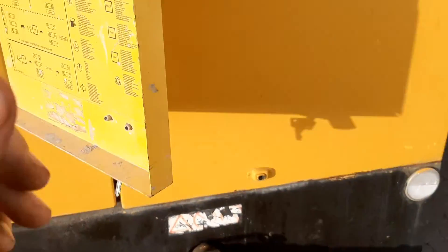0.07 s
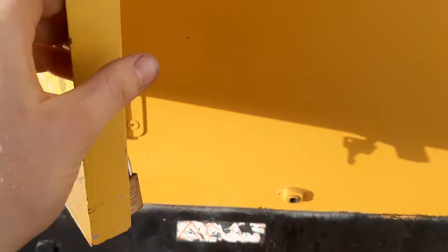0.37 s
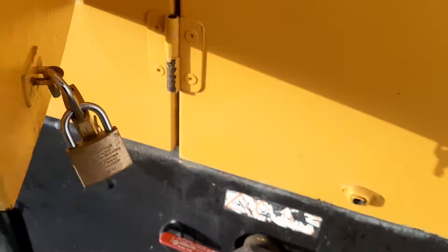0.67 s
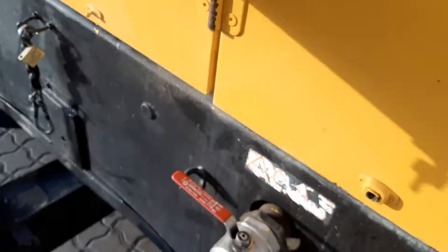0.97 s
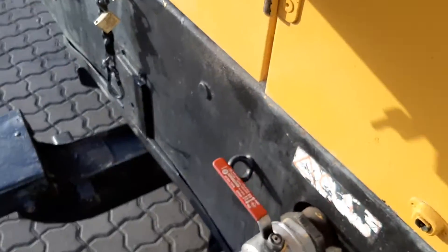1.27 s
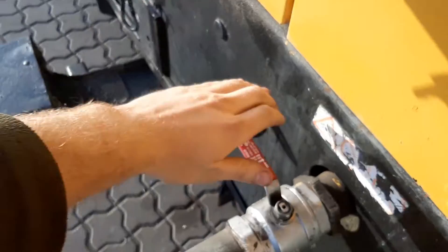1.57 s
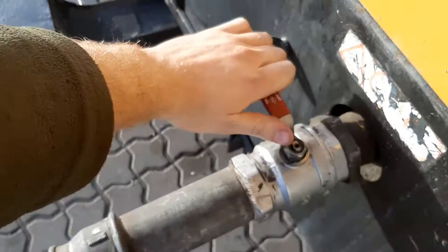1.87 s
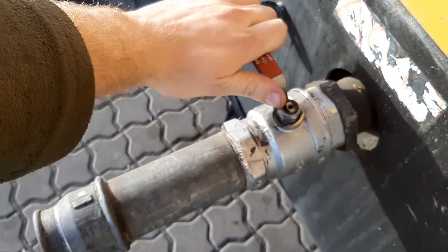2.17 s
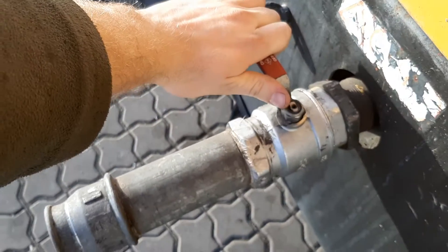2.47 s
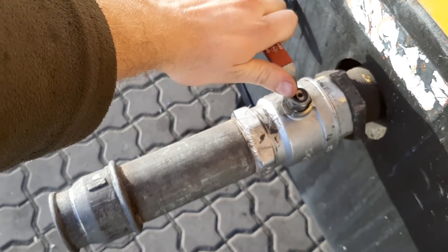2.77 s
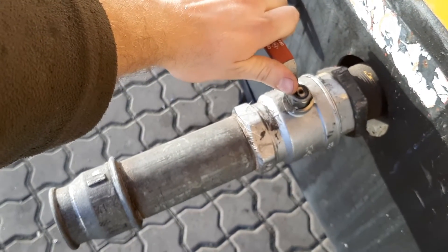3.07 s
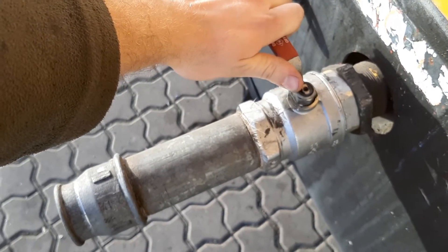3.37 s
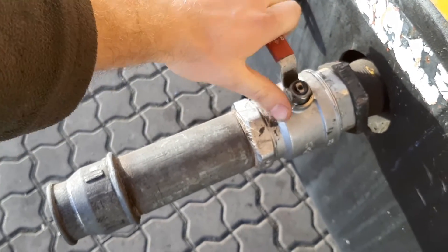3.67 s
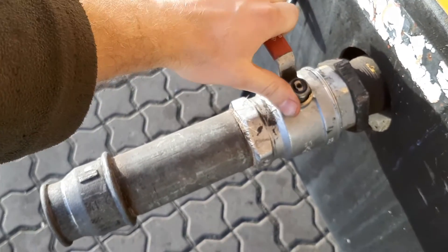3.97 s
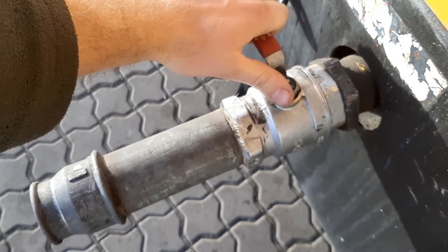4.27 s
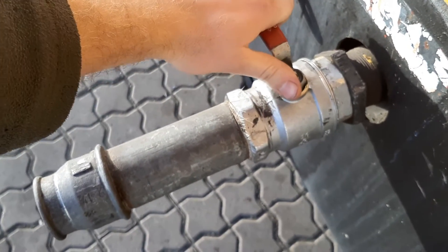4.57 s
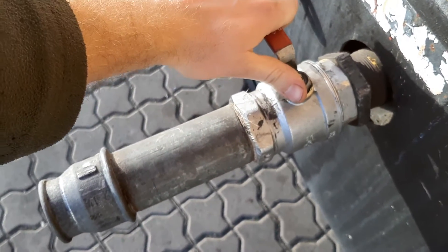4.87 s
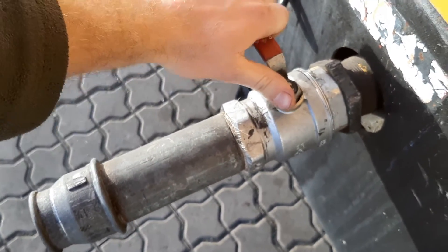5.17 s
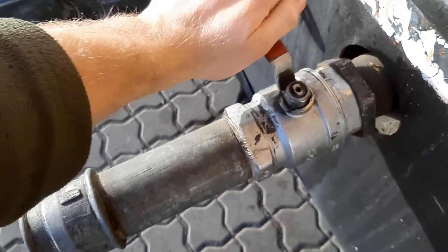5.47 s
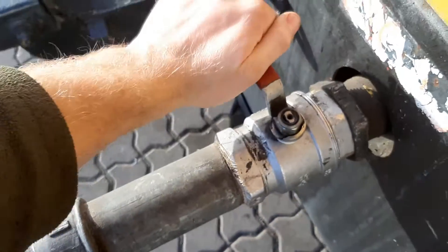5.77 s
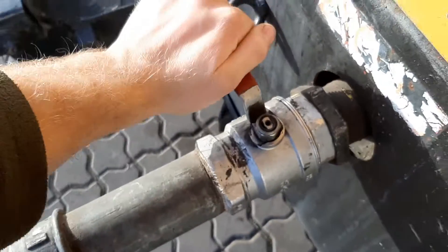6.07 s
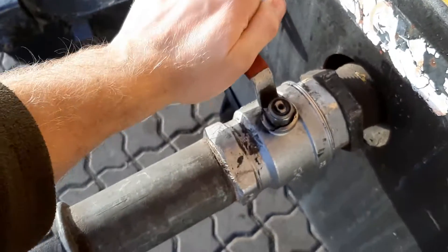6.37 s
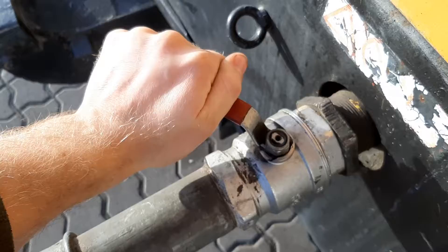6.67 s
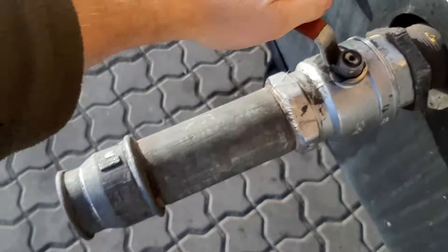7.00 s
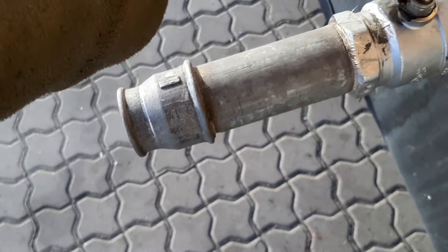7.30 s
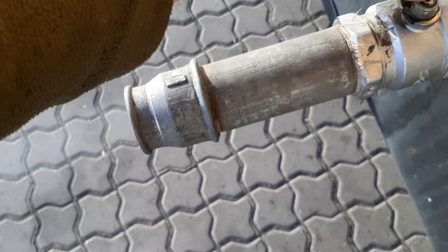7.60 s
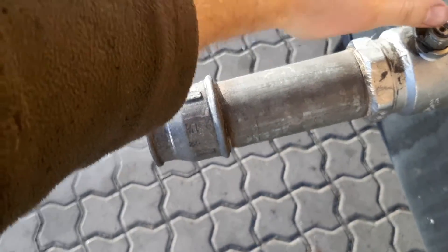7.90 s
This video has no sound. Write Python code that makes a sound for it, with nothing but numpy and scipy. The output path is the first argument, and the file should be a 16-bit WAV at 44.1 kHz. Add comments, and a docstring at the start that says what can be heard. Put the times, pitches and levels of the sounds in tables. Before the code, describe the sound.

Heard at arm's length in an open yard, a compressor's diesel engine hums and clatters evenly. Early on, a short ringing hiss comes with a padlock rattling against a metal hatch. The machine drones on alone until, near the end, air suddenly spits and blasts out of a pipe. This loud, broad hiss covers the drone and takes on a slightly whistling, hollow colour as the microphone draws back.

```python
"""On a paved yard, a towed diesel screw compressor drones at arm's length: periodic firing, rotor
discharge and fan give tones, while combustion knock and cooling air excite the sheet-metal canopy.
A hatch swings with a hollow tone and a brief hiss, and its padlock rings in its normal modes.
Later a ball valve is turned and a turbulent jet roars from an open pipe, comb-filtered by a close echo.
An automatic gain control ducks the drone under the jet."""
import sys
import numpy as np
from scipy import signal
from scipy.fft import rfft, irfft, next_fast_len
from scipy.io import wavfile

SR = 44100
rng = np.random.default_rng(int(sys.argv[2]) if len(sys.argv) > 2 else 0)


def to_wav(sig):
    """Store sig (one row per channel, or 1-D mono) as 16-bit WAV at the path in sys.argv[1].

    Samples outside -1..1 are clipped; the rate is SR.
    """
    pcm = np.clip(np.atleast_2d(sig), -1, 1) * 32767
    pcm = np.round(pcm).astype(np.int16)
    wavfile.write(sys.argv[1], SR, pcm.T)  # frames by channels


N = 358974
TIME, BINS = np.arange(N) / SR, np.fft.rfftfreq(next_fast_len(N, True), 1 / SR)
FIRING_HZ, LOBE_HZ = 48.45, 111.3   # rates of cylinder firing and rotor lobe discharge
# the listener's movements: start t/s, duration/s
STEP_DOWN = 0.55, 1.55   # from the hatch to the outlet
RETREAT = 6.6, 0.79   # back along the pipe


def compressor(speed_wander=0.001, split_hz=970, left_lag_ms=0.114):
    """Superposition of tones and noise timed by one governed shaft; deeper and duller at the outlet."""
    shaft_time = np.cumsum(1 + speed_wander * drift(2.5)) / SR
    at_outlet = move(*STEP_DOWN)
    drone_db, treble_db = between(-0.3, 0.1, at_outlet), between(2.5, 0.5, at_outlet)
    noise = clatter(shaft_time)
    low = below(noise, split_hz)
    boom = at_outlet * canopy_boom()
    deep = from_db(drone_db) * (drone(shaft_time) + low + boom) + hatch_cavity()
    bright = from_db(treble_db + 0.54 * drift(15)) * (noise - low)
    sizzle = 0.53 * (1 - at_outlet) * (noise - below(noise, 8400))
    left, right = deep + bright + sizzle + at_outlet * panels()
    return np.array([delayed(left, left_lag_ms), right])   # the machine stands to the right


# upper exhaust orders: f/FIRING_HZ, relative level/dB
EXHAUST_ORDERS = [(1.5, -41), (1.75, -47), (2.5, -39.5), (2.75, -37), (3, -31), (3.5, -43), (4, -36),
                  (4.5, -38.5), (5, -31.5), (6, -34.5), (7, -35.5), (9, -39.5), (13, -40), (15, -42.5),
                  (17, -51), (18, -45), (18.5, -43.5), (20, -62), (21, -43.5), (22, -46.5), (32, -45)]
# screw harmonics: f/LOBE_HZ, relative level/dB
SCREW_HARMONICS = [(1, -26.5), (2, -33.5), (3, -28.5), (4, -33), (5, -49)]
# fan and belt-driven parts: f/Hz, relative level/dB
FAN_PARTIALS = [(177, -41), (182.9, -29.5), (208.5, -39), (256.8, -34), (271.5, -37), (305.5, -33),
                (375.5, -43.5), (417, -44), (513, -38.5), (526, -47), (541, -42.5), (565.5, -45),
                (577, -40.5), (639, -41.5), (671, -40.5), (711.5, -40.5), (717, -44.5), (735, -43.5),
                (785, -42.5), (808, -44), (814, -43), (930, -43.5)]
# the machine's stereo balance: f/Hz, left minus right level/dB
MACHINE_PAN = [(60, -1.5), (200, -4), (380, -4), (700, -2), (1290, -5), (2380, -7.5), (4400, -10),
               (8100, -3), (15000, -4.5)]
def drone(shaft_time, waver_db=1.03):
    """Periodic sources have line spectra; neighbouring lines of exhaust, screw and fan beat."""
    # leaning in over the valve tilts the two lowest firing harmonics; drawing back undoes it
    lean_s = (TIME - 3) * (1 - move(*RETREAT))
    shade_db = -10 * (1 - move(0, 1))   # the hatch screens the screw until it has swung away
    fan_db = -9.5 * (1 - move(*STEP_DOWN))
    tones = [(FIRING_HZ, -31 - 0.4 * lean_s), (2 * FIRING_HZ, -27 + 0.7 * lean_s)]
    tones += [(order * FIRING_HZ, db) for order, db in EXHAUST_ORDERS]
    tones += [(hz, db + fan_db) for hz, db in FAN_PARTIALS]
    tones += [(order * LOBE_HZ, db + shade_db) for order, db in SCREW_HARMONICS]
    out = gears(shaft_time)
    for hz, db in tones:
        wave = np.sqrt(2) * np.sin(2 * np.pi * (hz * shaft_time + rng.random()))
        gain = from_db(db + standing_wave_db(hz) + waver_db * drift(2))
        out += wave * gain * pan(np.interp(hz, *np.transpose(MACHINE_PAN)))
    return out


def gears(shaft_time, whine_hz=2036):
    """Amplitude and phase modulation make the gear whine flutter; a narrow noise band adds rasp."""
    phase = 2 * np.pi * whine_hz * shaft_time + 0.5 * drift(7.4)
    whine = np.sqrt(2) * np.sin(phase) * from_db(1.5 * (drift(12) + 0.5))
    rasp = resonant_noise(2028, width_hz=65)
    return from_db(-39 + standing_wave_db(whine_hz)) * (whine + rasp) * pan(balance_db=-10)


# nodes and antinodes passed: t/s, f/Hz, level change/dB, half duration/s
NODE_CROSSINGS = [(.1, 2035, -10, 0.29), (.5, 2035, 7, .08), (.1, 338.5, -11, 0.27),
                  (1.1, 222.6, -22, 0.95), (0.96, 97, -19, 0.35), (1.15, 2035, -9, 0.28),
                  (1.62, 2035, 2, .12), (2.1, 2035, 1.5, .25), (1.28, 334.5, -14, 0.18),
                  (1.9, 445, 2.5, 0.91), (2.4, 111.5, -9, 0.31), (3.5, 111.5, -2.5, 0.93),
                  (3.55, 2035, -1, 0.17), (4.4, 2035, 4, 0.28), (5.17, 2035, 2, .22),
                  (5.85, 2035, -10, 0.47), (7.7, 445, -10, 1.3)]
def standing_wave_db(tone_hz):
    """Interference: a tone sinks or swells as the listener passes through its standing wave."""
    return sum(db * swell(s, half_s) for s, hz, db, half_s in NODE_CROSSINGS
               if abs(tone_hz / hz - 1) < 0.01)


# each cylinder's knock: relative level/dB
CYLINDER_LEVELS = [0.22, -0.69, 0.85, -0.8]
# engine knock: f/Hz, relative spectral level/dB
KNOCK_SPECTRUM = [(60, -82), (150, -72), (280, -60), (440, -63.5), (478, -72), (520, -63.5), (740, -60),
                  (1000, -58), (1190, -66), (1330, -61.5), (2000, -67.5), (3500, -71), (7000, -76),
                  (16000, -87)]
# cooling air and combustion noise: f/Hz, relative spectral level/dB
RUSH_SPECTRUM = [(20, -85), (38, -70), (52, -53), (100, -50.5), (220, -50.5), (330, -49.5), (440, -52.5),
                 (478, -54.5), (515, -53), (900, -57), (1190, -61), (2000, -62), (3200, -69), (7000, -67),
                 (11000, -73.5), (16000, -77.5)]
# sheet-metal resonances: f/Hz, bandwidth/Hz, gain/dB
CANOPY_MODES = [(1544, 51, 2), (2004, 130, 3.5), (2210, 66, 2), (2803, 47, 6), (3970, 270, 3),
                (4800, 240, 3.5)]
# the machine's stereo likeness: f/Hz, coherence (clipped to 1 in use)
MACHINE_COHERENCE = [(130, 0.4), (290, 1.5), (640, 0), (1400, -0.09), (15000, 0)]
def clatter(shaft_time, knock_fall_db=3, rush_fall_db=0.5):
    """Cyclostationary noise: each firing starts a fresh surge and a knock that recurs every cycle."""
    firings, cylinders = shaft_time * FIRING_HZ, len(CYLINDER_LEVELS)
    age, cylinder = firings % 1, firings.astype(int) % cylinders
    cycle_sample = (firings % cylinders * SR / FIRING_HZ).astype(int)
    blow = from_db(np.array(CYLINDER_LEVELS)[cylinder] - knock_fall_db * (age - 0.5))
    surge = from_db(rush_fall_db * (1 - age))
    canopy = MACHINE_COHERENCE, MACHINE_PAN, CANOPY_MODES
    knock = colour(white()[:, cycle_sample] * blow, KNOCK_SPECTRUM, *canopy)
    return knock + colour(white() * surge, RUSH_SPECTRUM, *canopy)


# air modes under the canopy: f/Hz, bandwidth/Hz, level/dB
CAVITY_MODES = [(180, 10, -34), (220.4, 11, -34), (251.7, 13, -35), (290, 11, -39)]
def canopy_boom():
    """Cavity resonance: narrow modes driven by noise boom in slow, uneven surges."""
    boom = sum(from_db(db) * resonant_noise(hz, width)[0] for hz, width, db in CAVITY_MODES)
    return boom * pan(balance_db=-4)


# panels by the outlet: f/Hz, bandwidth/Hz, level/dB
PANEL_MODES = [(1550, 28, -40), (2780, 33, -44), (3885, 44, -45)]
def panels():
    """Forced vibration: randomly driven panels sing at their natural frequencies."""
    song = sum(from_db(db) * resonant_noise(hz, width) for hz, width, db in PANEL_MODES)
    return song * pan(balance_db=-4)


# turbulent roar: f/Hz, relative spectral level/dB
JET_SPECTRUM = [(20, -78), (45, -60), (75, -53), (250, -52), (500, -52.5), (1000, -52), (2000, -53),
                (3050, -54), (4500, -53.5), (6500, -53), (7700, -54), (11500, -54), (16000, -56)]
# outlet pipe resonances: f/Hz, bandwidth/Hz, gain/dB
PIPE_MODES = [(1494, 68, 4.5), (2023, 60, 5)]
# the jet's stereo likeness: f/Hz, coherence
JET_COHERENCE = [(60, 0.17), (300, 0), (800, 0.048), (1500, 0.0097), (15000, 0)]
# its stereo balance: f/Hz, left minus right level/dB
JET_PAN = [(100, 5.5), (700, 4), (1290, 3), (2380, 0.5), (4400, -3.5), (6300, -5.5), (7800, -2.5),
           (15000, -4)]
# its gliding howl: t/s, f/Hz, relative level/dB
HOWL_PATH = [(6.55, 3900, -29), (6.72, 4150, -27), (6.88, 3730, -26), (6.99, 3410, -33), (7.08, 4690, -32),
             (7.25, 4426, -23), (8.1, 4400, -26)]
def jet(opens_s=6.503, turn_s=0.16, sag_db_per_s=3, flutter_db=1.4):
    """Turbulence through the ball valve radiates broadband noise, fading as tank pressure sags."""
    open_s, retreat = np.maximum(TIME - opens_s, 0), move(*RETREAT)
    gap = np.minimum(open_s / turn_s, 1) ** 1.4
    level_db = 34 - sag_db_per_s * open_s - 10.5 * retreat
    roar = colour(white(), JET_SPECTRUM, JET_COHERENCE, JET_PAN, PIPE_MODES)
    bass_db = between(-1, 0, retreat)   # the low roar fills in with distance
    roar += (from_db(bass_db) - 1) * below(roar, 1600)
    howl_hz, howl_db = in_time(HOWL_PATH)
    howl = from_db(howl_db + 1.5 * drift(8)) * resonant_noise(howl_hz, width_hz=760)
    roar += howl * pan(balance_db=-4)
    roar[1] += echo(roar[1])   # only on the side that faces the pipe
    return gap * from_db(level_db + flutter_db * drift(9)) * roar


# close reflection during the retreat: t/s, delay/ms, gain
ECHO_PATH = [(6.7, .35, 0.35), (6.87, 0.37, 0.8), (7.0, 0.42, 0.64), (7.1, .51, 0.56), (7.25, .57, 0.49),
             (7.5, 0.64, 0.59)]
def echo(direct):
    """Comb filtering: added to its source, this inverted treble echo cuts notches that fall as it lags."""
    lag_ms, gain = in_time(ECHO_PATH)
    treble = below(direct - below(direct, 4600), 10000)
    return -gain * delayed(treble, lag_ms)


# spits of air: t/s, f/Hz, level/dB, half duration/s
VALVE_SPITS = [(6.541, 3510, -8, 0.011), (6.62, 4070, 5, .022), (6.683, 3550, 13, 0.032),
               (6.692, 4150, 7, .028), (6.73, 4900, 3, .035), (6.83, 4030, 4, 0.03),
               (6.885, 3480, 7, 0.039), (7.128, 4600, 2, .028)]
def valve_spits(width_hz=370):
    """Edge noise: air catching on the rim of the ball flares in narrow bands."""
    spits = sum(from_db(db) * swell(s, half_s) * resonant_noise(hz, width_hz)
                for s, hz, db, half_s in VALVE_SPITS)
    return spits * pan(balance_db=-4)


# the brief hiss: f/Hz, relative spectral level/dB
HISS_SPECTRUM = [(500, -86), (1300, -58), (3000, -60.5), (5000, -61), (6500, -62), (12000, -56.5),
                 (16000, -66)]
# its peaks and dips: f/Hz, bandwidth/Hz, gain/dB
HISS_RESONANCES = [(2220, 300, 5), (2765, 37, 15), (3230, 120, 2), (3460, 70, 5), (3730, 78, 9),
                   (4120, 90, 4), (5160, 120, 4), (5400, 70, 9), (7700, 960, 11), (9010, 610, 25),
                   (11500, 540, -7), (13100, 600, -8), (15200, 500, 4)]
def brief_hiss(split_hz=3400):
    """Frequency-dependent decay: a ringing hiss loses its treble first."""
    hiss = colour(white(), HISS_SPECTRUM, MACHINE_COHERENCE, MACHINE_PAN, HISS_RESONANCES)
    low = below(hiss, split_hz)
    treble = from_db(3.5) * (hiss - low)
    flicker = from_db(0.52 * drift(40))
    return flicker * (spurts(t60_s=0.78) * low + spurts(t60_s=0.33) * treble)


# spurts of the hiss: t/s, relative level/dB, hold/s
HISS_SPURTS = [(0.629, -3.5, 0.047), (0.72, -6, .033)]
def spurts(t60_s, attack_s=0.011):
    """Incoherent addition: envelopes that rise, hold and decay sum in power."""
    gains = [move(s, attack_s) * from_db(db - 60 * np.maximum(TIME - s - attack_s - hold_s, 0) / t60_s)
             for s, db, hold_s in HISS_SPURTS]
    return np.linalg.norm(gains, axis=0)


# tones within the hiss: t/s, f/Hz, level/dB, half duration/s
METAL_TONES = [(.645, 3480, -32, .012), (.66, 5430, -30, 0.03), (.668, 4870, -33, .022),
               (0.682, 2765, -27, 0.036), (.692, 5130, -32, .01), (.725, 3000, -33, .015),
               (.756, 3250, -28.5, 0.023), (.765, 2765, -31, .018), (.767, 3730, -25, .02),
               (.777, 4130, -32.5, .022), (.795, 4670, -33, .013), (.806, 2790, -31, .014),
               (.83, 4070, -32, .01), (1.045, 2690, -33, .022)]
def metal_ringing():
    """Gaussian tone pulses flare one after another and are heard as metallic ringing."""
    tones = sum(from_db(db) * swell(s, half_s) * np.sin(2 * np.pi * hz * TIME)
                for s, hz, db, half_s in METAL_TONES)
    return tones * pan(balance_db=-9)


# the padlock striking the hatch: t/s, level/dB
LOCK_IMPACTS = [(.637, -30), (.668, -30), (.697, -29), (.728, -28), (.755, -33), (.793, -27), (.829, -26),
                (.868, -27), (0.894, -32), (.972, -36), (1.02, -30)]
# its modes: f/Hz, relative level/dB, T60/s
LOCK_MODES = [(1470, 3, 0.044), (2730, -9, 0.13), (3350, -8, .12), (3480, -6, .1), (3700, -8, .12),
              (3920, -10, 0.092), (4140, -10, .1), (4880, -11, .08), (5070, -16, .07)]
def padlock(unevenness_db=2.5):
    """Damped free vibration: each impact excites every normal mode with a strength of its own."""
    out = np.zeros(N)
    for s, db in LOCK_IMPACTS:
        age = np.maximum(TIME - s, 0)
        for hz, mode_db, t60 in LOCK_MODES:
            strength = from_db(db + mode_db + unevenness_db * rng.standard_normal())
            decay = from_db(-60 * np.minimum(age / t60, 10))
            out += strength * decay * np.sin(2 * np.pi * hz * age)
    return out * pan(balance_db=6)


def hatch_cavity(peak_s=0.2):
    """Cavity resonance: the gap behind the closing hatch sounds a hollow tone that rises and fades."""
    hz = between(253, 321, move(start_s=0.16, takes_s=0.45))
    age = TIME - peak_s
    level_db = -22 + np.minimum(12 * age, -24 * age)
    return from_db(level_db) * resonant_noise(hz, width_hz=26)[0] * pan(balance_db=-4)


def resonant_noise(centre_hz, width_hz):
    """Frequency shifting: low-passed noise on a carrier gives a stereo band of rms 1."""
    lowpass = signal.butter(2, width_hz / 2, fs=SR, output="sos")
    envelope = signal.sosfilt(lowpass, white() + 1j * white())
    phase = 2 * np.pi * np.cumsum(centre_hz * np.ones(N)) / SR
    band = np.real(envelope * np.exp(1j * phase))
    return band / band.std()


def colour(pair, spectrum, coherence, balance, resonances=()):
    """Spectral shaping: two white noises, as mid and side, take on a spectrum with resonance peaks."""
    size = next_fast_len(N, True)
    mid, side = rfft(pair, size)
    alike = np.clip(at_hz(coherence), -1, 1)
    peaks_db = sum(db / (1 + (2 * (BINS - hz) / width) ** 2) for hz, width, db in resonances)
    stereo = np.sqrt(1 + alike) * mid + np.sqrt(1 - alike) * side * [[1], [-1]]
    shaped = stereo * from_db(at_hz(spectrum) + peaks_db) * pan(at_hz(balance))
    return irfft(shaped, size)[:, :N] * np.sqrt(SR) / 2


def white():
    """Two uncorrelated white noises."""
    return rng.standard_normal((2, N))


def drift(rate_hz, hop=40):
    """Low-passed random fluctuation of unit standard deviation."""
    pole = np.exp(-2 * np.pi * rate_hz * hop / SR)
    noise = rng.standard_normal(N // hop + 2002)
    slow = signal.lfilter([1], [1, -2 * pole, pole * pole], noise)[2000:]
    return np.interp(np.arange(N) / hop, np.arange(len(slow)), slow / slow.std())


def pan(balance_db):
    """Constant-power panning; positive is left."""
    gains = from_db(np.array([[0.5], [-0.5]]) * balance_db)
    return gains / np.sqrt(np.mean(gains ** 2, axis=0))


def below(x, hz):
    """Zero-phase low-pass filter."""
    return signal.sosfiltfilt(signal.butter(2, hz, fs=SR, output="sos"), x)


def delayed(x, lag_ms):
    """Propagation delay, steady or varying."""
    return np.interp(TIME - lag_ms / 1000, TIME, x)


def from_db(db):
    """Level to amplitude ratio."""
    return 10 ** (np.asarray(db) / 20)


def in_time(rows):
    """Linear interpolation of each column over time."""
    s, *columns = np.transpose(rows)
    return [np.interp(TIME, s, column) for column in columns]


def at_hz(points):
    """Interpolation over log frequency."""
    hz, value = np.transpose(points)
    return np.interp(np.log(BINS + 1), np.log(hz), value)


def move(start_s, takes_s):
    """Raised-cosine transition from 0 to 1."""
    return 0.5 - 0.5 * np.cos(np.pi * np.clip((TIME - start_s) / takes_s, 0, 1))


def between(first, last, share):
    """Linear blend of two values."""
    return first + (last - first) * share


def swell(s, half_s):
    """Gaussian pulse of height 1."""
    return np.exp(-((TIME - s) / half_s) ** 2)


def scene():
    """Superposition in the open air: machine, escaping air and hatch sounds add."""
    return compressor() + jet() + valve_spits() + brief_hiss() + metal_ringing() + padlock()


def gain_control(x, threshold_db=-14.5, squeeze=0.9, response_s=0.027, ahead_s=0.014):
    """Look-ahead compression takes back most of the running level's excess over the threshold."""
    pole = np.exp(-1 / (response_s * SR))
    power = signal.lfilter([1 - pole], [1, -pole], np.mean(x ** 2, axis=0))
    excess_db = np.maximum(10 * np.log10(power + 1e-12) - threshold_db, 0)
    return x * from_db(-squeeze * np.interp(TIME + ahead_s, TIME, excess_db))


# bands where the microphone is deaf: f/Hz, bandwidth/Hz
DEAF_BANDS = [(8450, 1200), (9000, 4500)]
def record(dry, cutoff_hz=15720):
    """Stages in cascade: microphone notches, gain control and a steep low-pass."""
    for hz, width_hz in DEAF_BANDS:
        dry = signal.lfilter(*signal.iirnotch(hz, hz / width_hz, fs=SR), dry)
    lowpass = signal.ellip(12, 0.1, 80, cutoff_hz, fs=SR, output="sos")
    return signal.sosfilt(lowpass, gain_control(dry))


dry = scene()
out = record(dry)
to_wav(out)
```